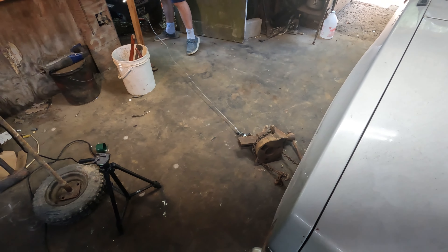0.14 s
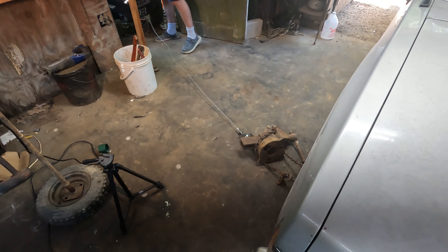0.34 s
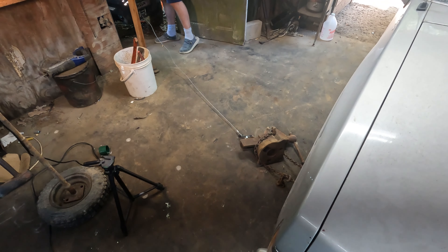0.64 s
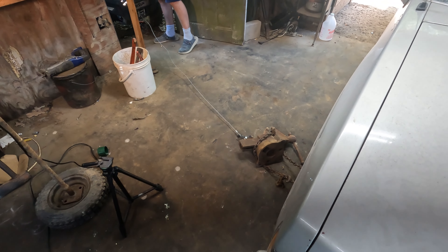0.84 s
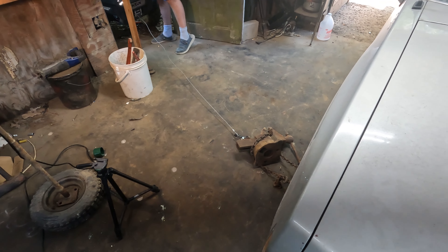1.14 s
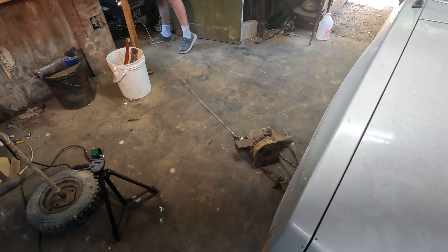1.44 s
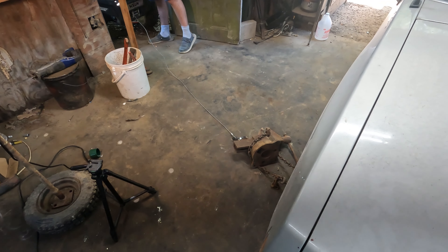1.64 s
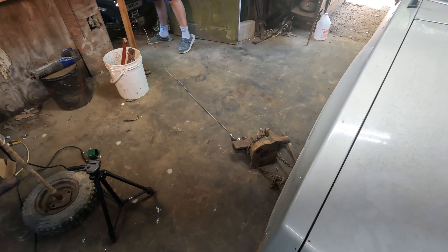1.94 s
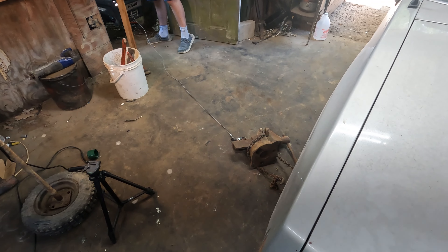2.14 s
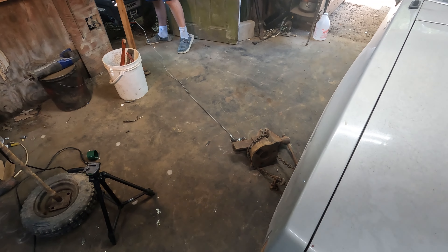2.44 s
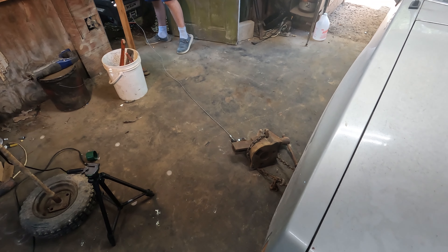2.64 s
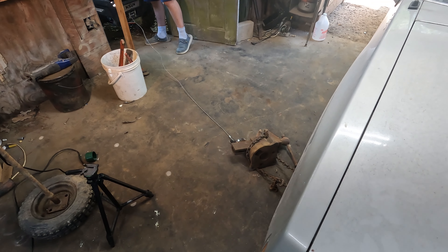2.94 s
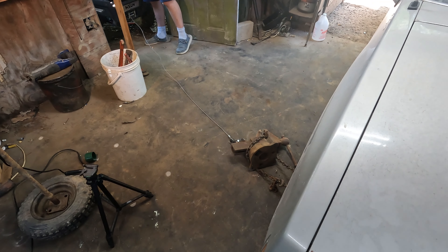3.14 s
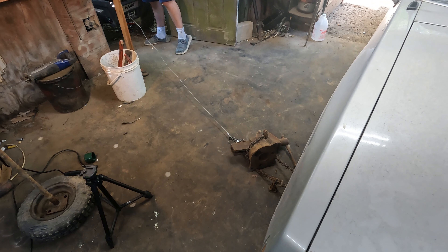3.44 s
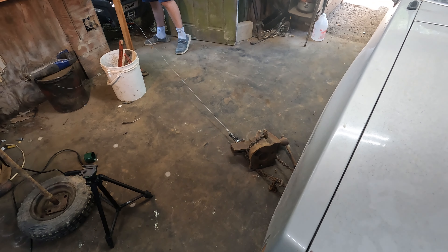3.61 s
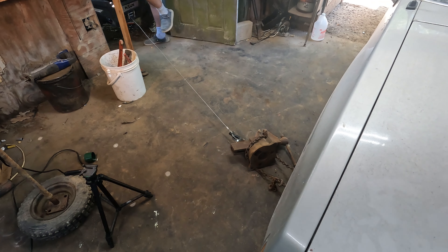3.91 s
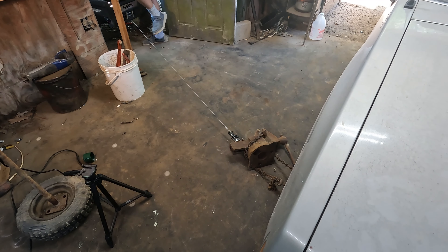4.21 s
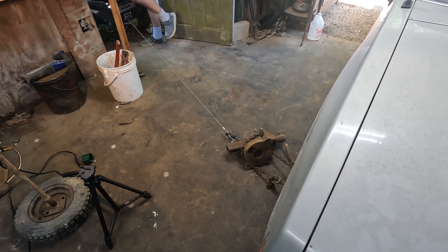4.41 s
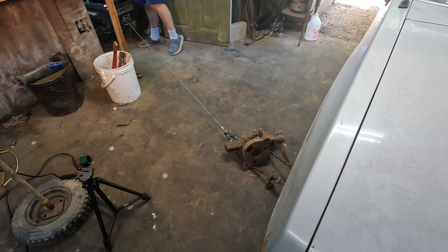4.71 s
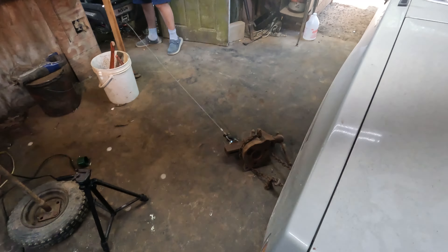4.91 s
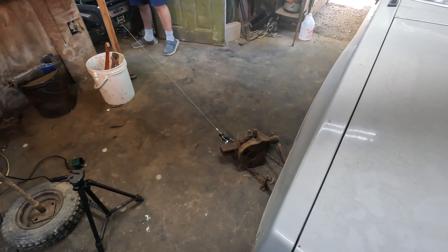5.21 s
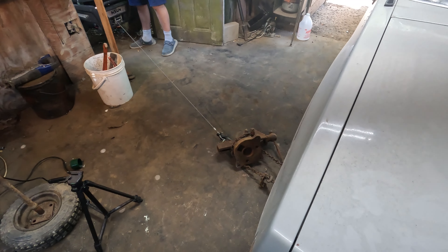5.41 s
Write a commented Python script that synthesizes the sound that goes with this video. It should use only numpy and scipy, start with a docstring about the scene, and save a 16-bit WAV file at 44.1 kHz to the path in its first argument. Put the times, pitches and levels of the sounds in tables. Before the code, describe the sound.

An electric winch is jogged in short bursts in a concrete shop, gears rattling and groaning, then whining harder under load between quiet gaps.

```python
"""Wind rumble and the faint end of a winch run come first; then the electric winch is jogged in short bursts
in a concrete shop, hauling a cable against a magnet on a heavy steel part. Tooth-impact noise rattles the gears
and rings their case, sine lines make the mesh whine, and coloured noise makes the frame groan under load.
Struck modes make the solenoid clack, dying noise makes the ticks, and clumped grit grates the load on the floor.
Low sine knocks, a metal tone, a faint whistle and quiet shop air complete the scene."""
import sys
import numpy as np
from scipy import signal
from scipy.fft import rfft, irfft, next_fast_len
from scipy.io import wavfile
from scipy.ndimage import map_coordinates

SR = 44100
rng = np.random.default_rng(int(sys.argv[2]) if len(sys.argv) > 2 else 0)


def inscribe(sig):
    """Save sig as 16-bit PCM at rate SR to the path in sys.argv[1].

    A 1-D sig is mono; a 2-D sig holds one channel per row.
    Samples are clipped to [-1, 1] before scaling.
    """
    pcm = np.round(np.clip(np.atleast_2d(sig).T, -1, 1) * 32767)
    wavfile.write(sys.argv[1], SR, pcm.astype(np.int16))


N = 245195


def amp(db):
    """Decibels to gain."""
    return 10 ** (np.asarray(db) / 20)


def rms_one(x):
    """Scale to rms 1."""
    return x / np.sqrt(np.mean(x ** 2) + 1e-20)


def seconds():
    """Time of every sample in seconds."""
    return np.arange(N) / SR


def curve(rows, index, outside=-120):
    """One column of a table drawn over time in straight lines, with a fixed value outside its span."""
    t, rows = seconds(), np.array(rows)
    out = np.full(N, float(outside))
    inside = (t >= rows[0, 0]) & (t <= rows[-1, 0])
    out[inside] = np.interp(t[inside], rows[:, 0], rows[:, index])
    return out


def plateau(start, end, level_db, rise, fall):
    """A level in dB that rises to its top and falls from it at steady rates in dB per second."""
    t = seconds()
    return level_db - rise * np.maximum(start - t, 0) - fall * np.maximum(t - end, 0)


def at_hz(points, hz):
    """Read a spectrum on a log frequency axis."""
    points = np.array(points)
    return np.interp(np.log(hz + 1), np.log(points[:, 0]), points[:, 1])


def colour(x, spectrum):
    """Give steady noise its spectrum; rms 1."""
    size = next_fast_len(N)
    gain = amp(at_hz(spectrum, np.fft.rfftfreq(size, 1 / SR)))
    return rms_one(irfft(rfft(x, size) * gain, size)[..., :N])


def band(x, low_hz, high_hz):
    """Band-pass."""
    sos = signal.butter(2, [low_hz, min(high_hz, .45 * SR)], "band", fs=SR, output="sos")
    return signal.sosfilt(sos, x)


def drift(rate):
    """Smooth chance wander through normal random knots, rate knots a second."""
    knots = rng.standard_normal(int(N / SR * rate) + 3)
    return map_coordinates(knots, [seconds() * rate], order=2)


def grit(per_s, spread_db):
    """Random small impacts of uneven size; rms 1."""
    sizes = amp(spread_db * np.minimum(rng.exponential(1, N), 5)) * rng.choice([-1, 1], N)
    return rms_one(sizes * (rng.random(N) < per_s / SR))


def ring(clicks, hz, t60):
    """A two-pole resonator: a unit click starts a dying sine of height 1."""
    radius, w = amp(-60 / (t60 * SR)), 2 * np.pi * hz / SR
    return signal.lfilter([0, np.sin(w)], [1, -2 * radius * np.cos(w), radius * radius], clicks + 1e-18)


# Jogs of the motor. Each row: switch-on in seconds, switch-off in seconds, gear rattle at speed in dB,
# how far below that it starts in dB, spin-up time in seconds, frame groan in dB, level change at the stop in dB.
JOGS = [(-.1, 0.004, -50, 8, .05, -52.5, 2.5), (0.528, 0.577, -46, 13, 0.018, -54, 0),
        (0.61, 0.74, -31.5, 9.5, 0.058, -33, 2.5), (1.397, 1.714, -33.5, 12.5, 0.029, -33.5, -0.5),
        (1.99, 2.122, -31, 7, 0.078, -36, 3.5), (2.864, 2.994, -26, 21.5, 0.048, -30, 2),
        (3.224, 3.882, -28, 12.5, 0.04, -32, 9), (4.407, 4.949, -29.5, 35, 0.022, -23.5, 2),
        (5.404, 5.7, -30.5, 26, 0.028, -23.5, 9)]
GEARS_COAST_DB_PER_S, FRAME_COAST_DB_PER_S, COAST_S = 460, 143, .045   # after the current is cut
SHUDDER_S, GEARS_SHARE = 0.031, 0.13   # the jerk as the brake bites, and how many of its dB reach the gears


def motor():
    """Gains of gears and frame: both spin up after switch-on and coast briefly after switch-off."""
    t, gear, frame = seconds(), np.zeros(N), np.zeros(N)
    for on, off, rattle_db, below_db, spin_s, groan_db, stop_db in JOGS:
        live = (t >= on) & (t < off + COAST_S)
        now = t[live]
        lag_db = below_db * np.exp(-(now - on) / spin_s)
        coast = np.maximum(now - off, 0)
        jerk_db = stop_db * np.exp(-((now - off) / SHUDDER_S) ** 2)
        gear[live] += amp(rattle_db - lag_db + GEARS_SHARE * jerk_db - GEARS_COAST_DB_PER_S * coast)
        frame[live] += amp(groan_db - lag_db + jerk_db - FRAME_COAST_DB_PER_S * coast)
    return gear, frame


# Full carrier speed, one typed value for each singing run: turns per second.
CARRIER_SPEED = [30.42, 28.38, 28.38]
SPIN_UP_S = .078   # the carrier gathers speed after switch-on


def carrier_turns():
    """Angle of the planet carrier in turns: speed climbs from rest at each switch-on towards its top."""
    t, on = seconds(), np.array(JOGS)[:, 0]
    since = t - on[np.searchsorted(on, t) - 1]
    run_ends = np.array(SINGING_RUNS)[:, 1] + .3   # each speed holds until .3 s after its run
    run = np.minimum(np.searchsorted(run_ends, t), len(SINGING_RUNS) - 1)
    speed = np.array(CARRIER_SPEED)[run] * np.tanh(since / SPIN_UP_S)
    return np.cumsum(speed) / SR


# Spectrum of the gear rattle. Each row: frequency in Hz, relative level in dB per Hz.
RATTLE_COLOUR = [(180, -26.5), (300, -11), (600, -16.5), (1030, -6.5), (2170, -9), (3390, -5), (5200, -7.5),
                 (6240, -6.5), (7860, -10), (9000, -17.5), (12000, -23.5), (15500, -38)]
# Gear case resonances, one entry per mode: frequency in Hz.
CASE_MODE_HZ = [815, 1064, 1122, 1305, 1438, 1660, 1820, 2310, 2745, 3290, 3430, 4530, 5960, 6270, 6760,
                7620]
# The same modes: bandwidth in Hz, which sets how fast each dies.
CASE_MODE_WIDTH_HZ = [25, 22, 20, 20, 14, 20, 8, 24, 40, 30, 150, 150, 58, 43, 52, 20]
# The same modes: relative drive in dB, before a waver and a scaling by bandwidth.
CASE_MODE_DB = [-4, 7, -1, -3, 9, 1, -3, -3, -8, 0, -6, -6, -10, -10, -9, -4]


def gears(turns, level):
    """Tooth impacts swell once a carrier turn; returns their rattle and the ringing of the case."""
    swell_db = 1.5 * np.sin(2 * np.pi * turns)
    teeth = grit(9000, spread_db=2.5) * amp(swell_db + drift(60))
    rung = np.zeros(N)
    for hz, width, mode_db in zip(CASE_MODE_HZ, CASE_MODE_WIDTH_HZ, CASE_MODE_DB):
        t60 = np.log(1000) / np.pi / width
        mode = ring(level * teeth, hz, t60) * width / 3000
        rung += amp(mode_db + 2 * drift(12)) * mode
    return level * colour(teeth, RATTLE_COLOUR), band(rung, 940, 17000)


# Runs that make the mesh sing. Each row: start in seconds, end in seconds,
# whine at first in dB, whine at last in dB, load from 0 to 1.
SINGING_RUNS = [(3.428, 3.917, -42.5, -36, 0.08), (4.583, 4.94, -29, -34, 0.82),
                (5.499, 5.6, -37, -31.5, 0.24)]
SING_RISE_DB_PER_S, SING_FALL_DB_PER_S = 120, 220


def singing():
    """Gain of each run's whine: silent before its switch-on, then swelling as the mesh loads up."""
    t, on = seconds(), np.array(JOGS)[:, 0]
    gains = []
    for start, end, first_db, last_db, _ in SINGING_RUNS:
        top_db = np.interp(t, [start, end], [first_db, last_db])
        swell = amp(plateau(start, end, top_db, SING_RISE_DB_PER_S, SING_FALL_DB_PER_S))
        gains.append((t > on[on < start].max()) * swell + 1e-9)
    return gains


# Lines of the gear train, 16 meshes a turn. One entry per line: cycles per carrier turn.
LINE_ORDER = [3, 6, 15, 16, 31, 32, 35, 36, 44, 47, 48, 54, 63, 64, 96]
# The same lines: relative level at light load in dB.
LINE_LIGHT_DB = [-6, -16, -20, 0, -6, -3, -7, -14, -14, -4, -8, -12, -7, -14, -6]
# The same lines: relative level at heavy load in dB.
LINE_HEAVY_DB = [-12, -8, -7, -3, -6, 0, -14, 0, -5, -6, -1, -4, -18, -9, -16]


def whine(turns):
    """Mesh lines and their side lines follow the carrier, each wavering a little; load shifts the balance."""
    gains = singing()
    load = np.clip(np.array(SINGING_RUNS)[np.argmax(gains, axis=0), -1], 0, 1)
    lines = np.zeros(N)
    for order, light, heavy in zip(LINE_ORDER, LINE_LIGHT_DB, LINE_HEAVY_DB):
        line_db = light + load * (heavy - light) + 2 * drift(16.0)
        lines += amp(line_db) * np.sin(2 * np.pi * (order * turns + rng.random()))
    return sum(gains) * lines


# Spectrum of the frame's groan. Each row: frequency in Hz, relative level in dB per Hz.
FRAME_COLOUR = [(29, -45), (50, -19), (162, -4), (385, -3.5), (441, -5.5), (687, -3.5), (900, -2),
                (1110, -1.5), (1370, 1), (1910, -3), (5000, -11), (6500, -128), (11000, -120)]


def groan(level):
    """The frame rumbles with the pull: unsteady noise, coloured low."""
    shake = rng.standard_normal(N) * amp(0.61 * drift(30.0))
    return level * colour(shake, FRAME_COLOUR)


# Low knocks of the frame, and one deep wind thump near 2.25 s. Each row: start in seconds, pitch in Hz,
# peak level in dB before a slight waver, length in seconds.
LOW_KNOCKS = [(1.516, 222, -40, 0.13), (1.61, 150.6, -41, 0.17), (2.112, 255, -41.5, 0.08),
              (2.237, 61.4, -27.5, 0.048), (3.234, 253.3, -32.5, 0.08), (4.45, 150, -28.5, 0.11),
              (4.489, 100, -24, 0.069), (4.548, 160.5, -22, 0.061), (4.583, 108, -25.5, 0.063),
              (4.827, 170, -21.5, 0.037), (4.868, 190, -24.5, 0.031), (4.994, 75.8, -30.5, 0.075)]


def knocks():
    """Soft low thumps: short sines that swell and fade."""
    t, thumps = seconds(), np.zeros(N)
    for start, hz, level_db, length in LOW_KNOCKS:
        swell = np.sin(np.pi * np.clip((t - start) / length, 0, 1)) ** 2
        thumps += amp(level_db) * np.sin(2 * np.pi * hz * t) * swell
    return amp(2 * drift(70)) * thumps


# The solenoid pulls in and drops out. Each row: time in seconds, strength in dB before mode levels and trim.
SOLENOID_BLOWS = [(0.616, -21), (0.7429, -25), (1.4015, -18.5), (1.6996, -20), (1.9925, -23), (2.1193, -20),
                  (2.8697, -33), (3.2285, -22), (3.8745, -16), (4.4067, -43), (5.404, -36)]
# Modes of the solenoid. Each row: frequency in Hz, relative level in dB, decay time t60 in seconds.
SOLENOID_MODES = [(1060, -9, .04), (1180, -4, .04), (1438, -10, .06), (1680, -3, .04), (1820, -14, .22),
                  (1900, -6, .03), (2220, -8, .03), (2410, -7, .03), (3300, -10, .03), (3430, -6, .03)]
BOUNCE_S, BOUNCE_DB = .012, -3   # the plunger rebounds once


def solenoid():
    """Each clack lands twice, each blow ringing every mode by chance strength; a small part, so no bass."""
    blows = SOLENOID_BLOWS + [(s + BOUNCE_S, db + BOUNCE_DB) for s, db in SOLENOID_BLOWS]
    at, strength_db = [round(s * SR) for s, _ in blows], np.array(blows)[:, 1]
    luck_db = rng.normal(0, 3, (len(blows), len(SOLENOID_MODES)))
    clack = np.zeros(N)
    for k, (hz, mode_db, t60) in enumerate(SOLENOID_MODES):
        clicks = np.zeros(N)
        clicks[at] = amp(strength_db + mode_db - 8.5 + luck_db[:, k])
        clack += ring(clicks, hz, t60)
    return band(clack, 850, 12000)


# Switch and small ticks. Each row: time in seconds, body strength in dB before an 8 dB cut,
# treble edge relative to the body in dB.
SWITCH_TICKS = [(0.156, -47.5, -3), (0.262, -41, -5.5), (0.5417, -40, -30), (0.5621, -29.5, -28),
                (0.9784, -46.5, 11), (1.168, -36, -28), (1.2261, -39.5, -7), (1.9568, -28.5, -32),
                (2.5799, -40, -6.5), (2.803, -31, -31), (4.226, -41, -9), (5.1162, -33.5, -2),
                (5.1927, -39.5, -6), (5.3404, -48, -4), (5.383, -43, -9)]
# Body, then edge, of a tick. Each row: low edge in Hz, high edge in Hz, decay time t60 in seconds.
BODY_AND_EDGE = [(3660, 5630, 0.061), (6560, 10800, 0.038)]


def ticks():
    """Short snaps: noise that dies fast, in a body band and a bright edge."""
    s, body_db, share_db = np.transpose(SWITCH_TICKS)
    out = np.zeros(N)
    for (low_hz, high_hz, t60), level_db in zip(BODY_AND_EDGE, (body_db, body_db + share_db)):
        starts = np.zeros(N)
        starts[np.round(s * SR).astype(int)] = amp(level_db - 8)
        dying = signal.lfilter([1], [1, -amp(-60 / (t60 * SR))], starts + 1e-18)
        out += dying * rms_one(band(rng.standard_normal(N), low_hz, high_hz))
    return out


# The load slips on the floor. Each row: loudest moment in seconds, level there in dB before a slight waver,
# swell in dB per second, fade in dB per second.
SLIPS = [(.9, -49.5, 130, 27), (.985, -45.5, 402, 202), (1.08, -47, 104, 119), (1.154, -45, 97, 183.5),
         (4.99, -31, 898, 97), (5.13, -52, 144, 209)]
# Spectrum of the grating. Each row: frequency in Hz, relative level in dB per Hz.
FLOOR_COLOUR = [(60, -47), (164, -3.5), (372, -8), (689, -7), (1000, -1.5), (1600, 0), (2500, -4.5),
                (4000, -15), (6590, -21), (14000, -36.5)]


def grating():
    """Steel slips on concrete: clumped grit, coloured and swelling at each slip."""
    rub = grit(4000, spread_db=3) * amp(2 * drift(40))
    slips = sum(amp(plateau(s, s, level_db, rise, fall)) for s, level_db, rise, fall in SLIPS)
    return slips * colour(rub, FLOOR_COLOUR)


# Metal ringing out. Each row: time in seconds, rms level in dB.
METAL_LEVEL = [(0.0, -67), (0.15, -69), (0.26, -62), (0.346, -75), (0.538, -79), (0.55, -77)]
RING_HZ = 705


def metal_ring():
    """One steady-pitched sine for ringing metal, swelling briefly and then sinking."""
    return amp(curve(METAL_LEVEL, index=1)) * np.sqrt(2) * np.sin(2 * np.pi * RING_HZ * seconds())


# A faint rising tone. Each row: time in seconds, pitch in Hz before a wobble, peak level in dB before a waver.
RISING_TONE = [(4.12, 540, -79), (4.26, 610, -70), (4.32, 660, -74), (4.4, 720, -77)]


def whistle():
    """A faint unsteady sine glides up in the pause."""
    hz = curve(RISING_TONE, index=1, outside=0) + 12 * drift(40)
    level_db = curve(RISING_TONE, index=2) + 4 * drift(25)
    return amp(level_db) * np.sin(2 * np.pi * np.cumsum(hz) / SR)


# Echo decay of the shop. Each row: frequency in Hz, decay time t60 in seconds.
ECHO_T60 = [(100, 0.77), (500, 0.61), (2000, 0.4), (5000, 0.36), (12000, 0.2)]
# Spread of the echoes. Each row: frequency in Hz, side level relative to mid in dB.
ECHO_WIDTH = [(60, -25), (150, -55), (400, -10), (1500, -3.5), (5000, -6), (9000, -18)]


def shop(x):
    """Direct sound plus a diffuse tail that dies faster in the treble, partly different at each side."""
    t, tail = np.arange(SR) / SR, 0
    for low in 40 * 2 ** np.arange(0, 9.):   # octave by octave
        centre = low * np.sqrt(2)
        echoes = band(rng.standard_normal((2, SR)), low, 2 * low)   # mid and side
        echoes[1] *= amp(at_hz(ECHO_WIDTH, centre))
        tail = tail + echoes * amp(-60 * t / at_hz(ECHO_T60, centre))
    tail = tail * np.clip(t / 0.0055, 0, 1)      # echoes build up over the first walls
    tail = tail / np.sqrt(np.sum(tail[0] ** 2))
    mid, side = signal.fftconvolve(x[None], tail, axes=1)[:, :N] * amp(-8.5)
    noise_burst = rng.standard_normal(256) / 16  # a short burst of noise widens the treble between left and right
    side = side + amp(-8.5) * band(np.convolve(x, noise_burst)[:N], 7700, 14500)
    side = side + 0.081 * band(x, 2400, 19000)
    direct = amp(-2.5) * x * amp([[.6], [-.6]])   # leans slightly left
    return direct + np.array([mid + side, mid - side])


# Wind on the microphone. Each row: time in seconds, rumble in dB before lean and buffets, flutter in dB.
WIND_LEVELS = [(0.0, -54, -70), (0.06, -41, -86), (0.6, -44, -79), (0.73, -48, -46), (0.77, -47, -42),
               (0.99, -47.5, -72), (1.13, -39, -59), (1.31, -58, -83), (1.47, -29.5, -44), (1.61, -55, -53),
               (1.7, -37, -44), (1.9, -49, -81), (2.0, -35, -43), (2.17, -47, -41.5), (2.24, -37, -66),
               (2.28, -34, -62), (2.34, -35.5, -62), (2.83, -37, -62), (2.96, -47, -42), (3.22, -49.5, -67),
               (3.27, -50, -47.5), (4.04, -49.5, -45.5), (4.37, -50.5, -75), (4.51, -54, -36.5),
               (4.91, -44, -43), (5.02, -34.5, -30), (5.37, -46, -58), (5.56, -52, -36)]
# Spectrum of the rumble. Each row: frequency in Hz, relative level in dB per Hz.
RUMBLE_COLOUR = [(7.1, -8), (12, 7.5), (46, -10), (105, -40), (151, -29), (262, -44), (300, -44),
                 (390, -68), (660, -120)]
WIND_LEAN_DB, WIND_LUMPS_DB = -2.5, -1   # left minus right; chance buffets


def wind():
    """Lumpy pressure on the microphone, partly shared by the sides, with a faster flutter above it."""
    shared, left, right = colour(rng.standard_normal((3, N)), RUMBLE_COLOUR)
    pressure = rms_one(shared + 0.63 * np.array([left, right]))
    lean_db = WIND_LEAN_DB / 2 * np.array([[1], [-1]])
    rumble = amp(curve(WIND_LEVELS, index=1) + WIND_LUMPS_DB * drift(9.0) + lean_db) * pressure
    flutter = rms_one(band(rng.standard_normal(N), 38, 117))
    return rumble + amp(curve(WIND_LEVELS, index=2)) * flutter


# Spectrum of the shop air. Each row: frequency in Hz, relative level in dB per Hz.
AIR_COLOUR = [(100, -9), (134, -18), (250, -20), (601, -26), (1490, -26), (3000, -30), (4800, -30),
              (7500, -34.5), (9000, -43), (15500, -47)]
# Loudness of the shop air. Each row: time in seconds, rms level in dB.
AIR_LOUDNESS = [(0, -60), (.2, -59), (.45, -61), (1.3, -56.5), (1.9, -55), (2.35, -70), (2.55, -65.5),
                (2.75, -64.5), (4.15, -56), (4.38, -65.5), (5.3, -55), (5.56, -55)]


def air():
    """The quiet shop: coloured noise, partly shared between the sides."""
    shared, left, right = colour(rng.standard_normal((3, N)), AIR_COLOUR)
    return amp(curve(AIR_LOUDNESS, index=1)) * rms_one(shared + .5 * np.array([left, right]))


def scene():
    """Winch, load and switch in the shop; metal tone, whistle, wind and air are added without echo."""
    turns = carrier_turns()
    gear_gain, frame_gain = motor()
    rattle, rung = gears(turns, gear_gain)
    tones = whine(turns) + knocks() + rung      # mostly direct, with little echo
    winch = rattle + groan(frame_gain) + amp(-16.5) * tones + solenoid()
    in_shop = shop(winch + grating() + ticks())
    return in_shop + 0.94 * tones + metal_ring() + whistle() + wind() + air()


CUTOFF_HZ = 15600


def record(dry):
    """The microphone fades in the high treble; a steep low-pass cuts the top."""
    soft = signal.sosfilt(signal.butter(3, 13000, fs=SR, output="sos"), dry)
    return signal.sosfilt(signal.ellip(14, .1, 100, CUTOFF_HZ, fs=SR, output="sos"), soft)


dry = scene()
out = record(dry)
inscribe(out)
```